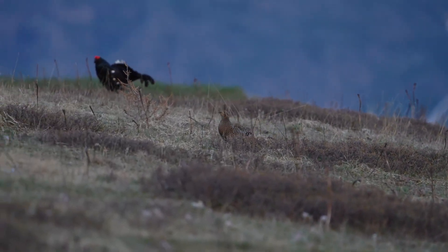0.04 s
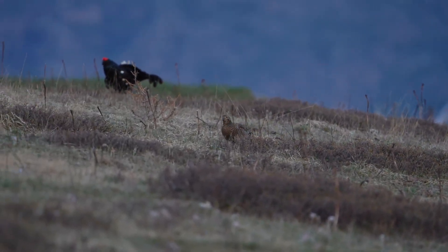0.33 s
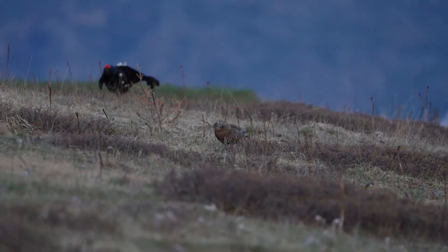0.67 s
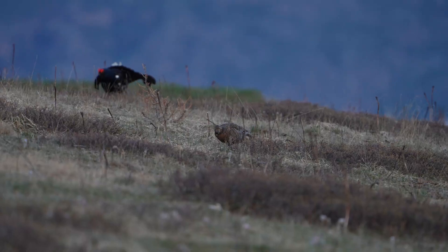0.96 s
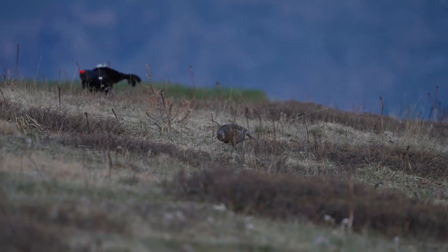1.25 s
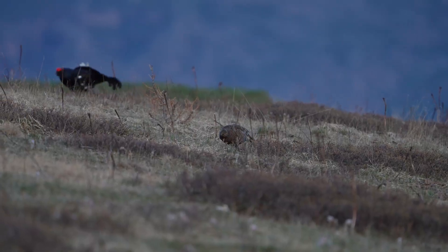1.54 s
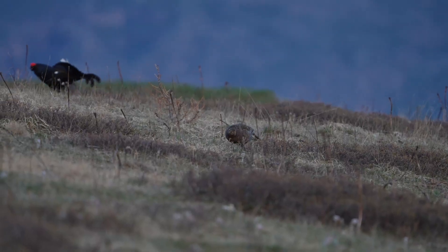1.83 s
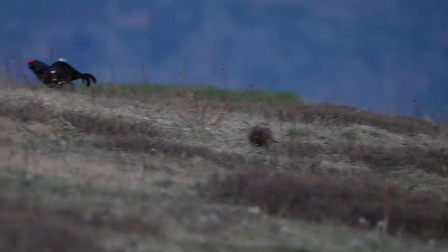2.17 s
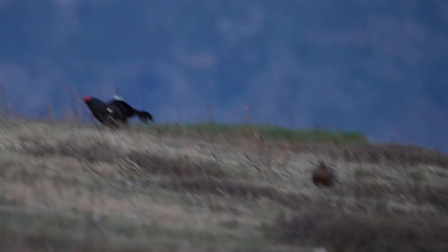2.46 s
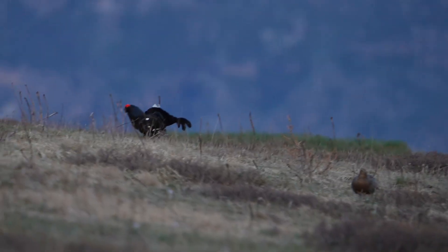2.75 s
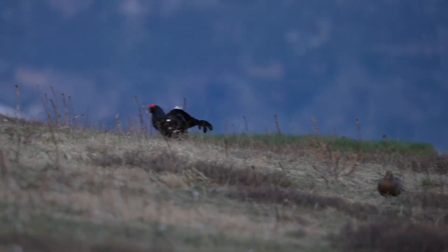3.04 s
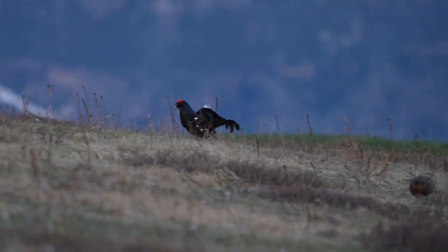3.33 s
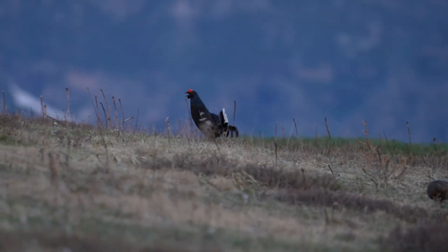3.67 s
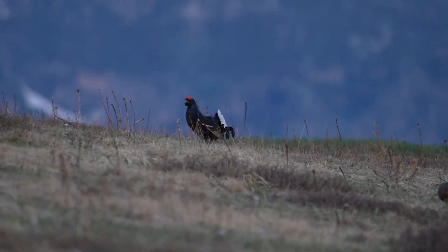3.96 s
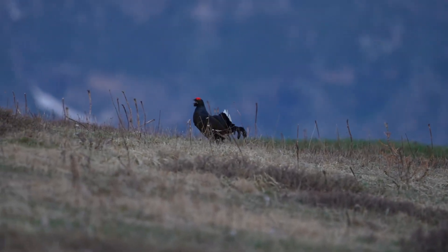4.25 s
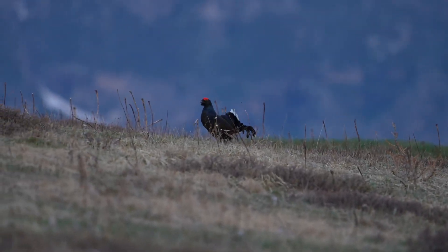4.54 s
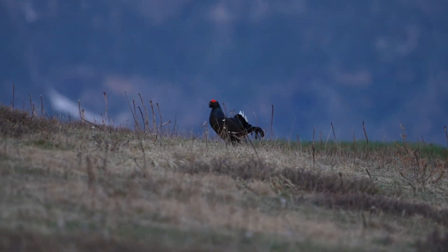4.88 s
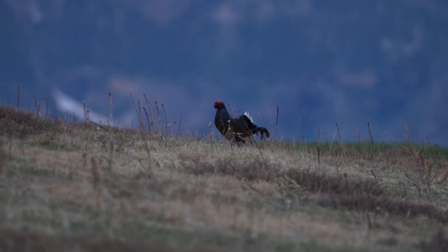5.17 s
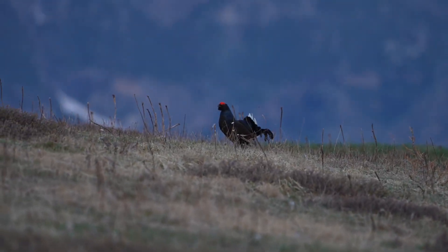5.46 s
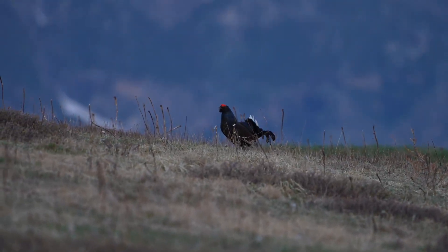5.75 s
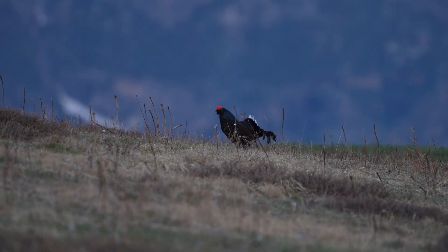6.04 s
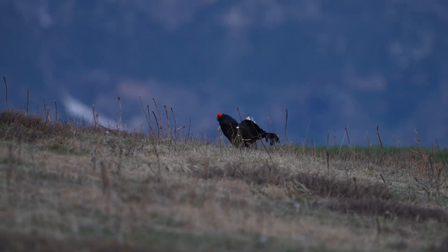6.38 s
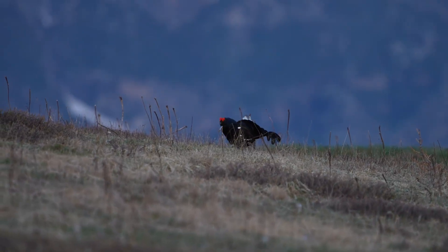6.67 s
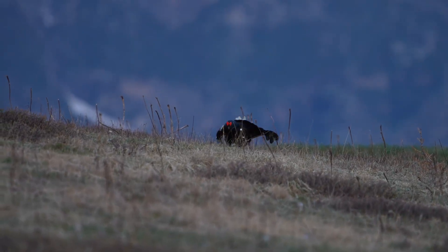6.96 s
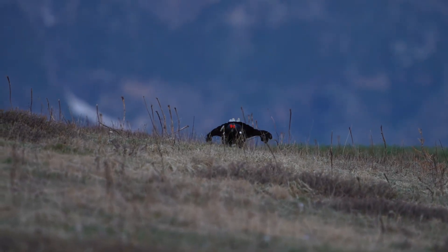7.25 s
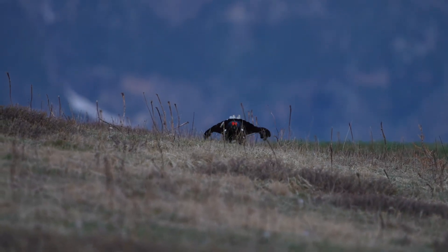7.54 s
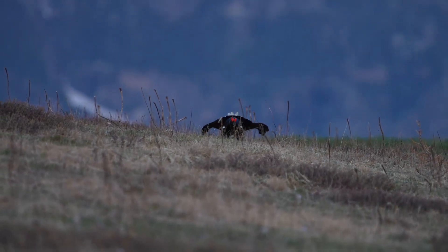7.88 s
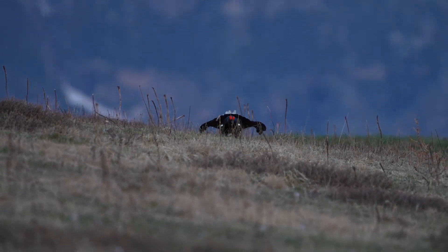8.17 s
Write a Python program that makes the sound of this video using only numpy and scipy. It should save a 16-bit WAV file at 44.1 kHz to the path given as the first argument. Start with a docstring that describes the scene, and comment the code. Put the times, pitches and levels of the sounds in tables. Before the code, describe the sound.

Wind rumbles and thumps unevenly on a hissing microphone on an open ridge, while hands rub and click on the camera body. A black grouse gives three raspy hissing display calls, each a sharp accent, a dip and a drawn-out swell, then a weaker fourth. Other grouse bubble very faintly in the distance at the start and again near the end.

```python
"""A black grouse on a windy ridge. From the start, wind rumbles and buffets a camera's hissing microphone,
hands rub and click on its body, and cocks farther off bubble faintly. At about 1, 3 and 6 s the grouse
forces air through its throat in a hissing display call: a sharp accent, a dip, a drawn-out swell.
From 2 s the grip also scuffs now and then. Near 7 s a weaker hiss follows and the bubbling returns."""
import sys
import numpy as np
from scipy import signal
from scipy.fft import rfft, irfft, next_fast_len
from scipy.io import wavfile
from scipy.ndimage import uniform_filter1d

SR = 44100
rng = np.random.default_rng(int(sys.argv[2]) if len(sys.argv) > 2 else 0)


def transcribe(u):
    """Save the signal u as a 16-bit wav file named by the first command-line argument.

    u: samples, shape (n,) or (channels, n), limited to [-1, 1]; the rate is SR.
    q: integer samples, one column per channel.
    """
    v = np.clip(np.atleast_2d(u).T, -1, 1)
    q = np.round(v * 32767).astype(np.int16)
    wavfile.write(sys.argv[1], SR, q)


N = 366471
TIME = np.arange(N) / SR
# gusts across the microphone: start/s, length/s, level/dB
GUSTS = [(0.002, 0.426, -37.6), (0.489, 0.019, -39), (0.585, 0.066, -38.9), (0.704, 0.096, -56),
         (0.836, 0.139, -37.5), (1.023, 0.036, -37), (1.232, 0.11, -38.5), (1.379, 0.097, -47),
         (1.53, 0.007, -35.5), (1.724, 0.3, -41), (2.063, 0.46, -43), (2.518, 0.14, -39),
         (2.701, 0.15, -45.5), (2.914, 0.055, -41.5), (3.016, 0.219, -40.5), (3.263, 0.081, -47),
         (3.534, 0.067, -51), (3.684, 0.22, -44.8), (4.02, 0.196, -54.5), (4.259, 0.28, -41.5),
         (4.536, 0.073, -48.5), (4.64, 0.23, -43.2), (4.926, 0.15, -47.5), (5.161, 0.018, -46.5),
         (5.233, 0.29, -46), (5.568, 0.219, -37.0), (5.826, 0.47, -38), (6.363, 0.47, -42),
         (6.898, 0.16, -45), (7.102, 0.116, -45), (7.259, 0.089, -38), (7.448, 0.011, -44.5),
         (7.522, 0.14, -42.5), (7.747, 0.15, -47), (7.998, 0.29, -41.5)]
GUST_RISE_S, GUST_FALL_S = 0.014, 0.016


def gain_of(db):
    """Decibels to amplitude."""
    return 10 ** (np.asarray(db) / 20)


def unit_rms(x):
    """Scales to an rms of one."""
    return x / np.sqrt(np.mean(abs(x) ** 2) + 1e-20)


def panned(db):
    """Stereo gains for a left-minus-right level difference."""
    return unit_rms(gain_of([[db / 2], [-db / 2]]))


def add(mix, s, sound):
    """Mixes a stereo sound in at time s, dropping what falls outside."""
    start = round(s * SR)
    sound = sound[..., max(-start, 0):]
    part = mix[:, max(start, 0):][:, :sound.shape[-1]]
    part += sound[..., :part.shape[-1]]


def coloured(x, points):
    """Shapes x with an EQ curve of (f/Hz, level/dB) points, at an rms of one."""
    hz, db = np.transpose(points)
    size = next_fast_len(x.shape[-1])
    shape = gain_of(np.interp(np.log(np.fft.rfftfreq(size, 1 / SR) + 1), np.log(hz), db))
    return unit_rms(irfft(rfft(x, size) * shape, size)[..., :x.shape[-1]])


def noise_pair(correlation, size=N):
    """White noise for the microphone's left and right ports."""
    a, b = rng.standard_normal((2, size))
    return np.array([a, correlation * a + np.sqrt(1 - correlation ** 2) * b])


def wander(t, per_s):
    """A random wobble with so many turns a second."""
    knots = rng.standard_normal(4096)
    return np.interp((t - t[0]) * per_s, np.arange(len(knots)), knots)


def resonate(x, hz, width_hz):
    """A steep resonance at hz, steady or gliding; complex, so that its phase can be turned."""
    turn = np.exp(2j * np.pi * np.cumsum(np.broadcast_to(hz, x.shape[-1])) / SR)
    pole = np.exp(-np.pi * width_hz / SR)
    return unit_rms(turn * signal.lfilter([1], np.poly([pole, pole]), x / turn))


def steadied(x, span_s):
    """Evens out the slow chance swells of a noise."""
    power = uniform_filter1d((x ** 2).mean(0), int(span_s * SR))
    return x / np.sqrt(abs(power) + 0.011)


def envelope(t, length, rise_s, fall_s):
    """Swells up to time zero, holds for length, then dies away."""
    return np.exp(-(np.minimum(t, 0) / rise_s) ** 2 - np.maximum(t - length, 0) / fall_s)


def swells(rows, rise_s, fall_s):
    """The joint envelope of (start/s, length/s, level/dB) events over the whole scene."""
    t = TIME[::64]
    power = sum((gain_of(db) * envelope(t - s, length, rise_s, fall_s)) ** 2 for s, length, db in rows)
    return np.interp(TIME, t, np.sqrt(power))


def at_ports(x, corner_hz=np.inf, veer=0, top_hz=800):
    """Wind pressure at both ports: eddies die out above the corner; the left leads as the air veers."""
    # the wind reaches the left port first: f/Hz, lead/rad
    port_lead = [(20, 0.1), (60, 0.3), (125, 0.76), (250, 1.6), (500, 1.52)]
    size = next_fast_len(x.shape[-1])
    f = np.fft.rfftfreq(size, 1 / SR)
    lead = np.interp(f, *np.transpose(port_lead)) * (1 + veer * rng.uniform(-0.85, 1))
    phase = lead * np.array([[.5], [-.5]])
    shape = np.exp(1j * phase - f / corner_hz) / (1 + (f / top_hz) ** 4)
    return irfft(rfft(x, size) * shape, size)[:, :x.shape[-1]]


def microphone_hiss(hiss_db=-56.5, drift_db=-0.17, ring_db=-65.0, flicker_db=2.0):
    """A bed of gently drifting hiss, with a narrow flickering band mostly on the right."""
    # steady air and microphone hiss: f/Hz, level/dB
    colour = [(30, -21), (200, 11), (420, 0.5), (600, 9.5), (800, 6.5), (1050, 7), (1280, 9), (1700, 6.5),
              (2200, 7), (2800, 1), (5000, 3), (9000, 1.5), (13500, 3), (16000, 1.5)]
    band = resonate(noise_pair(0.052), hz=3480, width_hz=215).real
    ring = unit_rms(band * gain_of(flicker_db * wander(TIME, 25)))
    hiss = coloured(noise_pair(0.0041), colour) * gain_of(hiss_db + drift_db * wander(TIME, 8))
    return hiss + gain_of(ring_db) * ring * panned(-6.5)


def wind_rumble(breeze_db=-55, wake_db=-1.5, lumpy_db=3.5):
    """The breeze's deep, lumpy rumble swells with each gust and sinks into lulls between them."""
    # wind pressure on the microphone: f/Hz, level/dB
    colour = [(10, -11.5), (22, -5), (36, -4), (55, -5.5), (90, -16), (160, -29.5), (400, -40), (900, -60)]
    rumble = steadied(coloured(at_ports(noise_pair(0.95)), colour), span_s=0.079)
    lumps = unit_rms(gain_of(lumpy_db * wander(TIME, 20)))
    wake = gain_of(wake_db) * swells(GUSTS, GUST_RISE_S, GUST_FALL_S)
    return rumble * lumps * np.hypot(gain_of(breeze_db), wake)


def gust(s, length, db, low_hz=55, eddy_hz=92.2, eddy_at_db=-40, lumpy_db=6, trim_db=-2.5):
    """A lumpy swell of turbulence; faster air has smaller eddies and sounds higher."""
    t = np.arange(-SR // 8, 2 * SR // 3) / SR
    low_cut = signal.butter(2, low_hz, "high", fs=SR, output="sos")
    air = signal.sosfilt(low_cut, noise_pair(0.77, size=len(t)))
    corner_hz = eddy_hz * gain_of(db - eddy_at_db) ** 0.66
    eddies = steadied(unit_rms(at_ports(air, corner_hz, veer=0.98)), span_s=0.049)
    eddies *= gain_of(lumpy_db * wander(t, 34))
    swell = envelope(t, length, GUST_RISE_S, GUST_FALL_S)
    level = gain_of(db + trim_db) * np.sqrt(np.mean(swell ** 2))
    return s + t[0], level * unit_rms(eddies * swell)


def rubbing(catches_per_s=650, catch_db=4, grip_db=-63.5, uneven_db=1.7, patchy_db=3, trim_db=-1):
    """Skin and cloth slide over the camera: a fine hiss whose tiny catches ring the shell."""
    # strokes of the hand: start/s, length/s, level/dB
    strokes = [(0, 0.022, -49.5), (.35, 0.033, -52), (.9, 0.072, -57.5), (1.25, 0.028, -54.5),
               (1.73, 0.041, -52.5), (2.02, 0.065, -43.5), (2.17, 0.08, -55), (2.61, 0.019, -50.5),
               (2.92, 0.58, -59.5), (4.37, 0.099, -59), (4.8, 0.06, -56), (5.93, 0.26, -55),
               (6.8, 0.045, -56.5), (7.08, 0.13, -56.5), (7.39, 0.082, -49), (7.6, 0.048, -53)]
    # friction hiss: f/Hz, level/dB
    colour = [(150, -32), (400, -10.5), (600, 5), (1000, -8), (2800, -4), (4500, -3), (7500, 0.5),
              (9500, 1.5), (12000, 0), (15500, -2)]
    # resonances of the camera shell: f/Hz, width/Hz, level/dB
    shell_modes = [(7700, 150, -19), (9310, 91, -17.5), (13200, 600, -20)]
    sizes = gain_of(catch_db * np.minimum(rng.exponential(1, (2, N)), 4))
    signs = rng.choice([-1, 1], (2, N))
    catches = unit_rms(sizes * signs * (rng.random((2, N)) < catches_per_s / SR))
    friction = coloured(noise_pair(0) + 1.06 * catches, colour)
    for hz, width, db in shell_modes:
        friction += resonate(catches, hz, width).real * gain_of(db + patchy_db * wander(TIME, 28))
    # the resting grip rustles faintly between strokes
    sliding = np.hypot(gain_of(grip_db), swells(strokes, rise_s=0.092, fall_s=0.15))
    return friction * sliding * gain_of(uneven_db * wander(TIME, 70) + trim_db) * panned(-1.2)


def coo(length, hz, db, fall=0.169, blur_hz=130, blur_share=1.3):
    """One soft, falling note of a grouse's bubbling, blurred by distance."""
    t = np.arange(0, length, 1 / SR)
    pitch = hz * (1 + fall * (.5 - t / length))
    tone = np.sin(2 * np.pi * np.cumsum(pitch) / SR)
    blur = resonate(noise_pair(1.0, size=len(t)), pitch, blur_hz).real
    return gain_of(db) * unit_rms((tone + blur_share * blur) * signal.windows.tukey(len(t), .7))


def distant_bubbling(notes_per_s=9, note_s=0.086, note_hz=533, spread=0.062, uneven_db=4.5):
    """Cocks farther off bubble in loose runs of short coos; a few stand out near the end."""
    # bouts of bubbling: start/s, length/s, level/dB
    bouts = [(0, 2.4, -71), (6.851, 1.45, -72.5)]
    # clearer single coos: t/s, length/s, pitch/Hz, level/dB
    clear_coos = [(7.025, 0.043, 565, -66), (7.672, 0.062, 547, -64.5), (7.755, 0.048, 546, -64),
                  (7.793, 0.057, 520, -62), (7.928, 0.068, 524, -62.5), (8.236, 0.05, 647, -65)]
    mix = np.zeros((2, N))
    for start, length, db in bouts:
        for s in np.arange(start, start + length, 1 / notes_per_s):
            late, detune, loud = rng.standard_normal(3)
            note_db = db + uneven_db * np.clip(loud, -2, 1)
            add(mix, s + .015 * late, coo(note_s, note_hz * (1 + spread * detune), note_db))
    for s, length, hz, db in clear_coos:
        add(mix, s, coo(length, hz, db))
    return mix


def eddy(s, db, hz, order=3):
    """An eddy strikes the ports: one short swing of pressure."""
    t = np.arange(-SR // 30, SR // 30) / SR
    pulse = (1 - 2j * np.pi * hz * t / (order + .5)) ** -(order + 1)
    swing = (pulse * np.exp(2j * np.pi * rng.random())).real
    return s + t[0], gain_of(db) * at_ports(swing, veer=0.74)


def buffeting(count=6, scatter_s=0.013, below_db=-12, spread=0.63):
    """Each buffet is one thump with a flurry of lesser eddies around it; the finest are the weakest."""
    # sharp buffets on the microphone, and near 4.38 s the dull thump that follows the hand's click: t/s,
    # level/dB, centre/Hz
    buffets = [(.026, -26, 199), (.127, -20.5, 259), (0.276, -27, 99), (.38, -29, 165), (.495, -27, 146),
               (0.631, -26, 327), (.928, -23.5, 189), (1.059, -25.5, 160), (1.276, -31, 100),
               (1.318, -26.5, 253), (1.537, -33, 119), (1.888, -20, 257), (1.939, -29, 230),
               (2.556, -25.5, 220), (2.668, -28, 159), (3.023, -30.5, 61), (3.079, -24.5, 65),
               (3.208, -28.5, 70), (3.799, -33.5, 69), (4.378, -24, 377), (4.388, -25.5, 300),
               (4.461, -25.5, 119), (4.655, -32.5, 132), (4.83, -33, 141), (5.058, -32, 80.6),
               (5.596, -30.5, 119), (5.678, -20.5, 170), (5.709, -21, 300), (5.84, -23, 277),
               (5.943, -24.5, 340), (5.986, -27, 163), (6.029, -27, 404), (6.081, -25.5, 242),
               (6.195, -28.5, 195), (6.726, -32, 214), (6.958, -24, 212), (7.12, -31.5, 130),
               (8.142, -30.5, 101)]
    mix = np.zeros((2, N))
    for s, db, hz in buffets:
        add(mix, *eddy(s, db, hz))
        for late, fine in rng.standard_normal((count, 2)):
            add(mix, *eddy(s + scatter_s * late, db + below_db - 2 * fine, hz * np.exp(spread * fine)))
    return mix


def rattle(t, decay_s, colour, tail=0.25, tail_s=0.021):
    """The noise burst of one contact, with a short rattling tail."""
    fade = (t >= 0) * (np.exp(-abs(t) / decay_s) + tail * np.exp(-abs(t) / tail_s))
    return coloured(noise_pair(0.072, size=len(t)) * fade, colour)


def clicking(uneven_db=3, trim_db=-6.5):
    """Each click is a bright tick, different at each point of contact, and a hollow body knock."""
    # clicks of the camera: t/s, tick level/dB, knock level/dB, knock pitch/Hz, left-right/dB
    clicks = [(.123, -46, -55, 600, -7), (0.354, -48.5, -67, 900, -2), (.578, -65, -52, 950, 3),
              (1.32, -49.5, -63, 700, -6), (1.967, -44, -52, 650, 1), (2.004, -42.5, -71, 700, -5),
              (2.067, -42, -69, 700, -4), (2.111, -42.5, -71, 900, -1), (2.261, -48, -64, 1500, -2),
              (2.291, -60, -53, 1830, -13), (2.604, -42, -44.5, 1640, 3.5), (2.619, -47, -70, 900, 2),
              (2.824, -76, -49.5, 1136, -8), (3.103, -76, -43, 1230, -7), (3.231, -68, -50, 1350, -6),
              (3.342, -56, -48.5, 1800, -3), (3.775, -56, -57, 1310, -11), (3.956, -54.5, -78, 900, -12),
              (4.337, -49, -51, 500, 2), (4.376, -40.5, -46, 1150, 2), (4.385, -46, -62, 600, -3),
              (4.407, -43, -80, 900, -2), (4.812, -48.5, -72, 900, -4), (5.896, -51, -74, 900, -9),
              (5.941, -45.5, -64, 905, -10), (6.777, -46.5, -49, 700, 7), (6.87, -53, -58, 1200, -4),
              (7.37, -46, -52.5, 620, 5), (7.595, -49, -51.5, 617, 0), (8.033, -54.5, -55.5, 1300, -8)]
    # the contact's tick: f/Hz, level/dB
    tick_colour = [(500, 4.5), (2500, -7.5), (4500, 5.5), (7500, 6.5), (11000, 7), (15500, 0)]
    # the body's knock: multiple of its pitch, level/dB
    knock_colour = [(.2, -5), (.6, 3.5), (1, 10), (1.6, 0.5), (2.8, -1.5), (5, -20), (14, -40)]
    t = np.arange(-128, 2560) / SR
    mix = np.zeros((2, N))
    for s, tick_db, knock_db, knock_hz, balance_db in clicks:
        bright = [(hz, db + uneven_db * rng.standard_normal()) for hz, db in tick_colour]
        hollow = [(knock_hz * ratio, db) for ratio, db in knock_colour]
        tick = gain_of(tick_db) * rattle(t, decay_s=0.0019, colour=bright)
        knock = gain_of(knock_db) * rattle(t, decay_s=0.0025, colour=hollow)
        add(mix, s + t[0], (tick + knock) * gain_of(trim_db) * panned(balance_db))
    return mix


def grouse_hisses(quiver=0.014, rasp_db=0.5, firm_db=-50, focus=0.28, beak_hz=1746, beak_width_hz=330):
    """Rasping air rings a steady beak and a throat that dips in pitch, then climbs with the swell."""
    # one curve a call: t/s, effort/dB, throat/Hz, beak resonance/dB
    calls = [
        [(.9, -59, 1700, -4), (.95, -48.5, 1770, 3), (1.01, -46.5, 1740, -2), (1.115, -58.5, 1630, -4),
         (1.2, -57.5, 1600, -10), (1.32, -53.5, 1820, 5), (1.39, -57, 2050, 0), (1.48, -57, 2200, -1),
         (1.6, -61, 2300, -7), (1.75, -63, 2230, -3), (1.84, -71, 2300, -2)],
        [(2.995, -66, 1650, 0), (3.035, -55, 1580, 1), (3.15, -59, 1440, -5), (3.3, -56.5, 1460, -8),
         (3.41, -56.5, 1460, 9), (3.49, -53, 1760, 4), (3.64, -53.5, 1680, 1), (3.86, -54.5, 1790, -8),
         (3.95, -61, 1810, -6), (3.985, -53.5, 1820, -8), (4.06, -52, 1780, -7), (4.14, -58, 1850, -2),
         (4.27, -65, 1850, -1)],
        [(5.995, -66, 1880, -5), (6.02, -48.5, 1850, -3), (6.07, -47.5, 1750, 4), (6.11, -49.5, 1570, 2),
         (6.18, -56.5, 1430, 0), (6.3, -57, 1430, -2), (6.4, -50.5, 1590, -1), (6.465, -43.5, 1770, 1),
         (6.57, -46, 1740, -11), (6.7, -49, 1770, -9), (6.78, -54.5, 1910, 0), (6.92, -58, 1920, -1),
         (7.06, -69, 2000, 0)],
        [(7.02, -69, 2120, 1), (7.39, -62.5, 2290, -12), (7.58, -69, 2450, 4)],
    ]
    # throat resonances: multiple of the main one, width/Hz, level/dB
    throat_modes = [(1, 197, 5), (1.16, 430, -8.5), (.88, 320, -11), (1.88, 980, -11)]
    left_lead = np.exp(1j * np.array([[1.86], [0]]))
    mix = np.zeros((2, N))
    for curve in calls:
        times, *controls = np.transpose(curve)
        t = np.arange(times[0], times[-1], 1 / SR)
        effort_db, throat_hz, beak_db = (np.interp(t, times, control) for control in controls)
        centre = throat_hz * (1 + quiver * wander(t, 59.4))
        modes = [(centre * ratio, width, db) for ratio, width, db in throat_modes]
        modes.append((beak_hz, beak_width_hz, beak_db))
        main, *others = [gain_of(db) * resonate(noise_pair(0.62, size=len(t)), hz, width)
                         for hz, width, db in modes]
        # the hiss turns diffuse as the effort fades
        voice = main * gain_of(focus * (effort_db - firm_db)) + sum(others)
        hiss = steadied(unit_rms((voice * left_lead).real), span_s=0.037)
        rasp = gain_of(rasp_db * wander(t, 130))
        level = gain_of(effort_db) * signal.windows.tukey(len(t), .02)
        add(mix, t[0], unit_rms(hiss * rasp) * level * panned(-7.5))
    return mix


def scuffing():
    """The hand shifts its grip with a dull, hollow rustle."""
    # shifts of the grip: start/s, length/s, level/dB
    scuffs = [(2.03, 0.23, -60.5), (4.31, 0.19, -58), (7.15, 0.38, -60)]
    # hollow rustle: f/Hz, level/dB
    colour = [(200, -10), (550, 6.5), (1250, -6), (1700, 4.5), (2600, -1.5), (4600, 4), (7500, -11)]
    return coloured(noise_pair(0), colour) * swells(scuffs, rise_s=0.046, fall_s=0.075)


def through_body(touch):
    """The camera body carries handling sounds unevenly to its two ports."""
    # the body's stereo tilt: f/Hz, left-right/dB
    body_balance = [(3000, 1), (5000, 2.5), (7500, -3.5), (10000, -4), (13500, 5)]
    size = next_fast_len(N)
    balance_db = np.interp(np.fft.rfftfreq(size, 1 / SR), *np.transpose(body_balance))
    return irfft(rfft(touch, size) * gain_of([balance_db / 2, -balance_db / 2]), size)[:, :N]


def scene():
    """Hiss, wind, handling and birds in one stereo mix."""
    mix = microphone_hiss() + wind_rumble()
    for row in GUSTS:
        add(mix, *gust(*row))
    handling = through_body(rubbing() + clicking() + scuffing())
    return mix + handling + distant_bubbling() + buffeting() + grouse_hisses()


def record(dry, edge_hz=15950):
    """A steep high cut takes off the very top."""
    high_cut = signal.firwin(511, edge_hz, window=("kaiser", 9), fs=SR)
    return signal.oaconvolve(dry, high_cut[None], "same")


dry = scene()
out = record(dry)
transcribe(out)
```